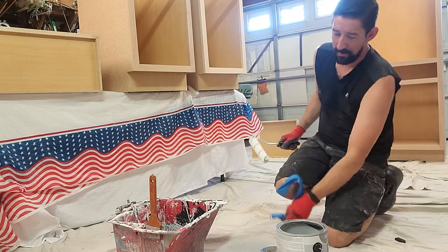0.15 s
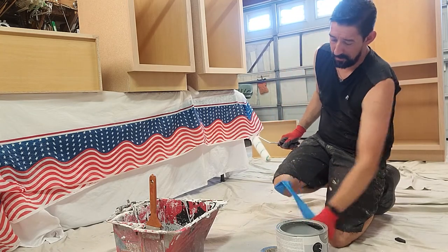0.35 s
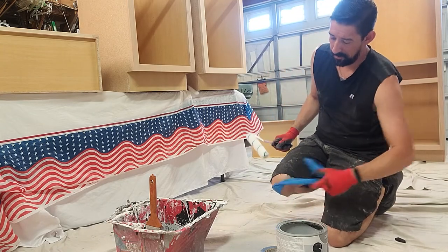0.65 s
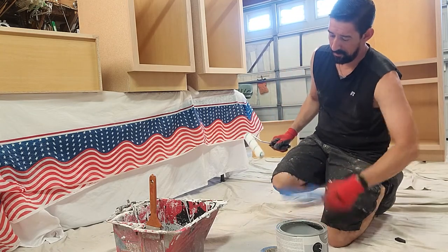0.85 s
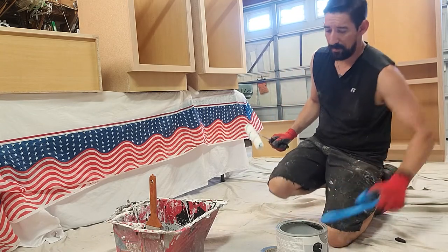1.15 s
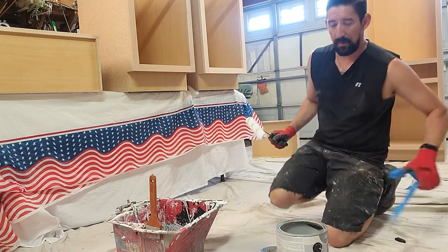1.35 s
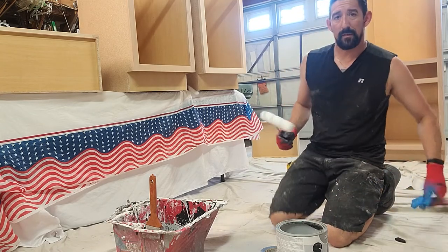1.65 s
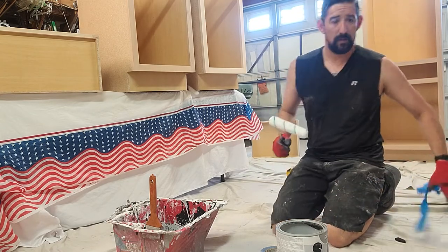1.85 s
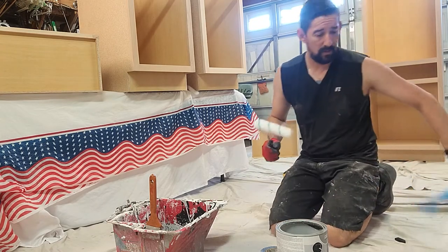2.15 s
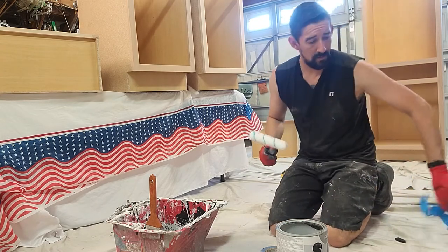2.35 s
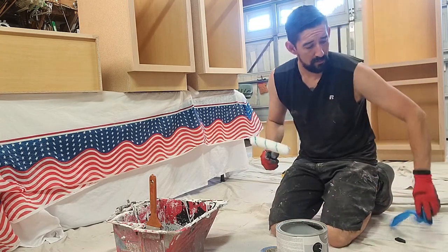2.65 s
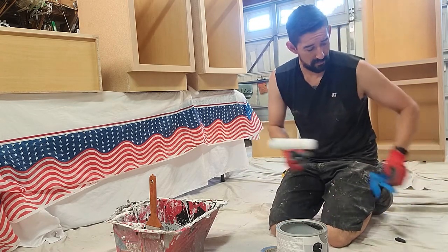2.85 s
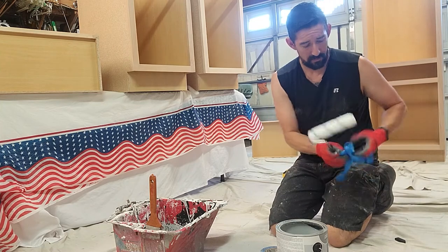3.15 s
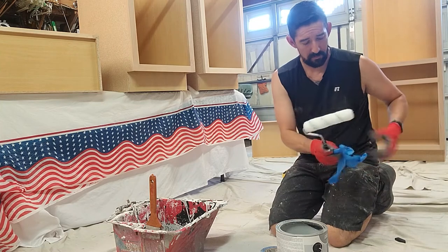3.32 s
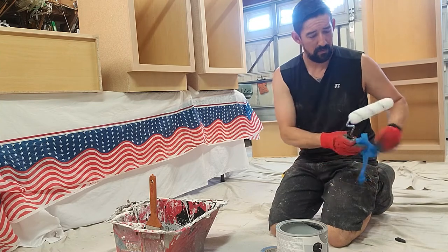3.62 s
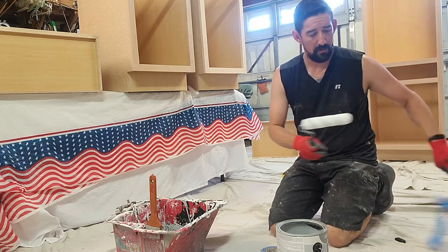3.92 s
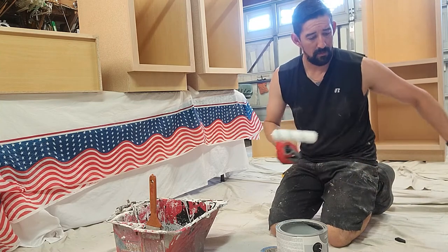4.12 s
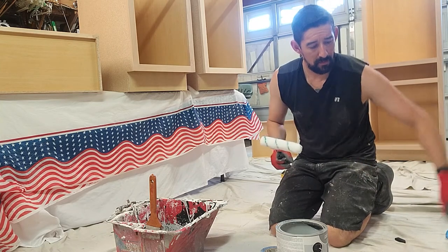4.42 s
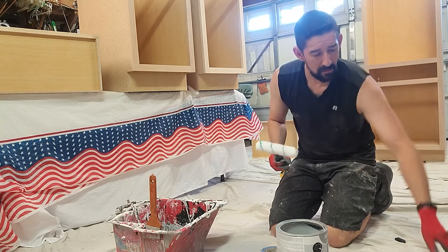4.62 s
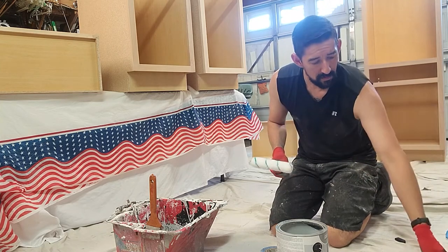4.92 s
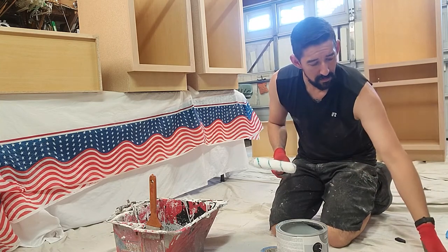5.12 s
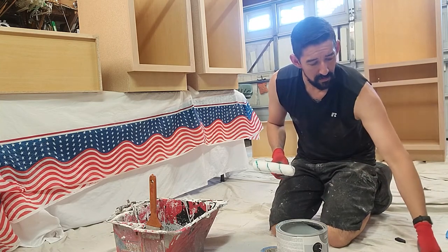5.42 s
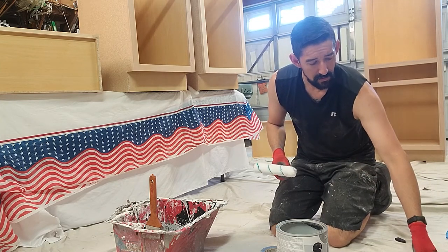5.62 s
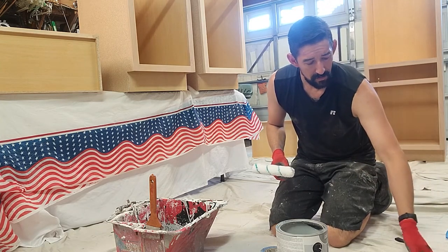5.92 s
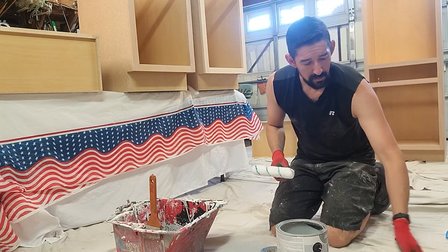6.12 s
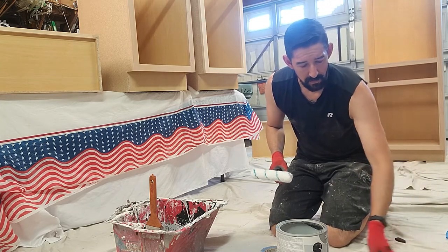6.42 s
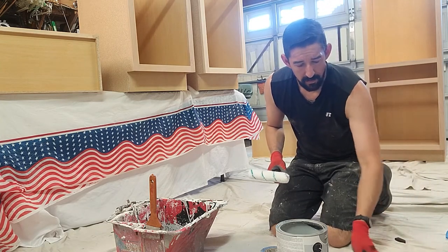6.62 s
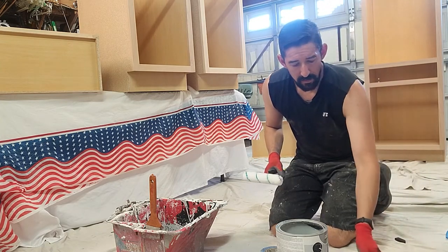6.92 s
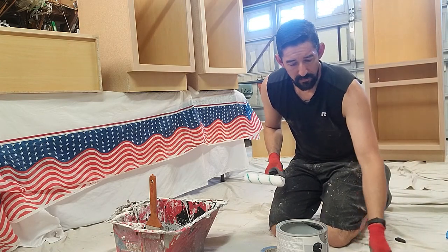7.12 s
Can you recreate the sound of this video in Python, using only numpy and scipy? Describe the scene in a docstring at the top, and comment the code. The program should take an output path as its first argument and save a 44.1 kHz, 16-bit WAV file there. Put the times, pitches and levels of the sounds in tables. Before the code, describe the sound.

Close, dry tape rips, papery pops and flutters, with one dull knee thud, then only a pulsing fan hum and faint cloth brushing.

```python
"""A fan runs throughout: motor and mains hums beat into a throb, under blade tones, rushing air and rumble.
From the start a painter pats masking tape onto a roller cover and rips it off to pull out loose fibres.
Each rip is a stream of tiny adhesive snaps; the strip also rasps, flutters and pops as it buckles.
Near 1.8 s a knee lands with a dull thud, among blunt knocks of roller, knee and hand.
After the last pull the strip is dropped at 4.3 s; a glove brushes the drop cloth, then a last soft knock."""
import sys
import numpy as np
from scipy import signal
from scipy.fft import rfft, irfft
from scipy.io import wavfile

SR = 44100
rng = np.random.default_rng(int(sys.argv[2]) if len(sys.argv) > 2 else 0)


def inscribe(sig):
    """Save sig as 16-bit PCM at rate SR to the path in sys.argv[1].

    A 1-D sig is mono; a 2-D sig holds one channel per row.
    Samples are clipped to [-1, 1] before scaling.
    """
    pcm = np.round(np.clip(np.atleast_2d(sig).T, -1, 1) * 32767)
    wavfile.write(sys.argv[1], SR, pcm.astype(np.int16))


N = 320166
T = np.arange(N) / SR

# Levels of tape and glove are those ahead of the garage's gain.
# tape pulled off the roller, light pats to full rips: (t/s, rise/s, hold/s, level/dB, body/dB near 1.4 kHz)
RIPS = [(.002, 0.003, 0.064, -38, 3), (0.072, 0.0099, 0.053, -36, -5.5), (0.719, 0.023, 0.0077, -35, -8.5),
        (0.8, 0.0027, 0.017, -37, -3), (0.941, 0.00092, 0.0087, -43.5, -26.5),
        (.987, 0.0026, 0.016, -32.5, -5.5), (1.484, 0.012, 0.055, -46, -4.5),
        (1.713, 0.023, 0.006, -43, -10.5), (1.822, 0.0022, 0.017, -46.5, -8.5),
        (2.214, 0.0026, 0.043, -37, -12), (2.626, .003, 0.069, -39, -11),
        (2.85, 0.018, 0.041, -45.5, -13.5), (3.186, 0.016, 0.043, -51, -0.5),
        (3.254, 0.025, 0.04, -37.5, -4), (3.612, 0.0057, 0.061, -46.5, -7.5),
        (3.72, 0.0063, 0.057, -41.5, -2.5), (3.786, 0.014, 0.024, -35.5, -3.5),
        (4.107, 0.017, 0.024, -67, 10)]
# the slack strip buckles by itself: (t/s, level/dB, ring f/Hz, crack lift/dB, chatter/s)
BUCKLES = [(0.2003, -31.5, 3150, -7, 0.021), (.4803, -31, 4030, -2, 0.041), (0.5517, -34, 2870, -32, 0.017),
           (.8091, -27, 4500, -18, 0.024), (1.1857, -31, 3240, -13.5, 0.009),
           (1.3563, -41.5, 3330, -17, 0.0017), (1.6347, -37.5, 3330, -34, 0.0066),
           (1.7828, -37, 2980, -24, 0.0071), (2.5015, -27.5, 2930, -18.5, 0.015),
           (2.597, -34, 2840, -20, .001), (2.6537, -28.5, 2920, -22, 0.056), (2.8638, -38, 2880, -5, 0.07),
           (3.058, -41.5, 3120, -21.5, 0.034), (3.9929, -35.5, 3150, -32, 0.0068),
           (4.132, -39, 2670, -25, 0.0066)]
# blunt knocks of roller, knee and hand: (t/s, level/dB, ring f/Hz, contact/s, t60/s)
KNOCKS = [(.013, -32, 1275, 0.0042, 0.091), (1.742, -50, 838, 0.0037, .12),
          (1.912, -30.5, 78.7, 0.014, 0.29), (2.228, -50.5, 580, 0.0047, 0.3),
          (6.585, -42, 297, 0.009, 0.12)]
# a glove brushes the drop cloth: (t/s, rise/s, hold/s, level/dB, rustle over hiss/dB)
BRUSHES = [(4.245, 0.044, 0.05, -86, 11), (4.844, 0.04, 0.032, -81.5, 13), (5.032, 0.1, 0.14, -86, -4),
           (6.09, 0.062, 0.276, -81.5, 7), (6.423, 0.052, 0.13, -66, -7)]
# spectrum of the paper tape: (f/Hz, relative density/dB)
TAPE_SPECTRUM = [(130, -34), (220, -4.5), (370, 6.5), (520, -1.5), (800, -0.5), (1100, -1), (1900, -2.5),
                 (3300, -4.5), (4600, -10.5), (5900, -10), (6900, -24.5), (8500, -17), (13000, -11),
                 (16000, -11.5)]
# spectrum of glove on cloth: (f/Hz, relative density/dB)
CLOTH_SPECTRUM = [(300, -10), (2000, -77), (5000, -4.5), (7000, -36), (9800, -18), (11200, 0.5),
                  (13000, -4), (16000, -8)]
# spectrum of the fan's rushing air: (f/Hz, relative density/dB)
AIR_SPECTRUM = [(94, -56.5), (160, -9), (218, -7.5), (254, -8), (280, -12), (381, 0.5), (582, -10.5),
                (628, -9.5), (666, -13.5), (1230, -14.5), (2380, -23), (4840, -30.5), (6850, -57.5),
                (10900, -45), (16000, -53)]
# spectrum of the low rumble: (f/Hz, relative density/dB)
RUMBLE_SPECTRUM = [(20, 10), (45, -22.5), (62, 18.5), (75, -28), (90, 17), (130, 17.5), (170, 0),
                   (260, -22), (1500, -98)]
# full tilt between the microphone ports: (f/Hz, left minus right/dB)
PORT_TILT = [(150, -2.5), (400, -1.5), (1300, 4.5), (2400, 2), (4400, 8), (8000, 13), (15000, 5.5)]
# fan overtones: (f/Hz, rms level/dB)
FAN_TONES = [(223.4, -63.5), (292.6, -64.5), (335, -79), (384, -71), (396, -85), (465, -70), (578, -71),
             (669.4, -68), (1233, -71.5), (1340, -86), (4334, -90), (4856, -81.5), (4940, -87)]
# resonances of the hollow roller core: (f/Hz, relative level/dB)
CORE_MODES = [(390, -16), (866, -16.5), (1120, -16), (1315, -0.5), (1650, 0.5), (2100, -12)]

# fan: the two hums crest together at THROB_S
MOTOR_HZ, MAINS_HZ, THROB_S = 111.64, 119.97, .135
MOTOR_DB, MAINS_DB, AIR_DB = -49, -52, -58.5  # rms
SLIP_WANDER_RAD, TONE_SWAY_DB = .16, 1.5
KNEE_S, KNEE_DB = 1.837, -44
TOP_HZ = 15900

# peel: all "per dB" settings count from a firm pull or from a body of 0 dB
FIRM_PULL_DB, CATCH_DB = -40, 3
RELEASE_S, RELEASE_PER_HOLD = 0.013, 0.042  # a longer pull takes longer to let go
# treble tilt, full from 8.5 kHz: more from a harder pull and a narrower strip
SIZZLE_DB, SIZZLE_PER_DB, SIZZLE_PER_BODY_DB = .5, 0.87, -0.12
# a fold pops as each pull comes taut; the gentler the start, the fainter the pop
POP_DB, POP_PER_DB, POP_EASE_DB_PER_S = -34.5, -0.06, 601
POP_HZ, POP_CRACK_DB = 3780, -4
# core level against the pull; a wide taut strip drives the core harder
CORE_DB, CORE_PER_BODY_DB, RASP_WIDTH = -8.5, 1.04, .16
# a buckled facet chatters around its ring, below its pop; a slow fold puts more into the chatter
CHATTER_DB, CHATTER_DB_PER_S, CHATTER_WIDTH = -20, 92, 0.4
# the strip rustles faintly in the hand until it is dropped
HELD_DB, DROP_S, DROP_FADE_S = -71.5, 4.32, 0.1
# it swings around each pull or buckle, gathering and settling
SWING_DB, SWING_PER_DB, BUCKLE_SWING_DB = -53.5, 1.2, -56
LEAD_S, SETTLE_S = 0.037, 0.04


def undb(db):
    """Decibels to gain."""
    return 10 ** (np.asarray(db) / 20)


def unit(x):
    """Scale to rms 1."""
    return x / np.sqrt(np.mean(x ** 2) + 1e-20)


def colour(x, points, size=2048):
    """Minimum-phase filter through (f/Hz, dB) points that keeps the power of white noise."""
    hz, db = np.transpose(points)
    bin_hz = np.arange(size + 1) * SR / size / 2
    log_gain = np.log(undb(np.interp(np.log(bin_hz + 1), np.log(hz), db)))
    # folding the cepstrum forward makes the filter causal
    cepstrum = irfft(log_gain)[:size]
    cepstrum[1:] *= 2
    response = irfft(np.exp(rfft(cepstrum, 2 * size)))[:size]
    return signal.fftconvolve(x, response / np.linalg.norm(response))[:len(x)]


def band(x, low_hz, high_hz):
    """Gentle band-pass."""
    edges = [low_hz, min(high_hz, SR / 2 - 100)]
    return signal.sosfilt(signal.butter(2, edges, "band", fs=SR, output="sos"), x)


def walk(rate):
    """Random drift through `rate` normal values a second, joined by straight lines."""
    knots = rng.standard_normal(1000)
    return np.interp(T * rate, np.arange(len(knots)), knots)


def add(track, s, sound):
    """Mix a sound into a track at a time."""
    i = max(int(s * SR), 0)
    track[i:i + len(sound)] += sound[:max(N - i, 0)]


def stroke(t, rise, hold, release):
    """A movement gathers force, holds and lets go."""
    gather = np.minimum(t / max(rise, 1 / SR), 1) ** 2
    return gather * np.exp(-np.maximum(t - rise - hold, 0) / release)


def threads(size, rate, scatter_db):
    """Lone clicks at random moments: many faint ones, a few strong."""
    strength = np.minimum(rng.exponential(size=size), 3)
    struck = rng.random(size) < rate / SR
    return struck * undb(scatter_db * strength) * rng.choice([-1, 1], size)


def lean(x, share):
    """Tilt the stereo image by a share of the port table: the left port hears more of the treble."""
    hz, db = np.transpose(PORT_TILT)
    bin_hz = np.arange(N // 2 + 1) * SR / N
    lean_db = share * np.interp(np.log(bin_hz + 1), np.log(hz), db)
    return irfft(rfft(x) * undb(np.array([lean_db, -lean_db]) / 2), N)


def fan(line_wander=0.34, rumble_db=-60, alike_hz=600):
    """An induction motor slips behind the mains, so their hums beat; blade tones and rushing air ride along."""
    turn = 2 * np.pi * (T - THROB_S)
    motor = undb(MOTOR_DB) * np.cos(MOTOR_HZ * turn + SLIP_WANDER_RAD * walk(0.22))
    mains = undb(MAINS_DB) * np.cos(MAINS_HZ * turn)
    tones = np.zeros((2, N))
    for hz, db in FAN_TONES:
        phase = hz * turn + line_wander * hz / 700 * walk(24)
        # higher tones reach the two ports more out of phase
        port_phase = rng.standard_normal((2, 1)) * min(hz / 800, 2)
        tones += undb(db + TONE_SWAY_DB * walk(3.8)) * np.cos(phase + port_phase)
    mid, side = (colour(band(rng.standard_normal(N), 136, 20000), AIR_SPECTRUM) for _ in range(2))
    # long waves reach both ports alike
    side = signal.sosfilt(signal.butter(1, alike_hz, "high", fs=SR, output="sos"), side) / np.std(mid)
    air = (unit(mid) + side * np.array([[1], [-1]])) * undb(AIR_DB + 1.6 * walk(1.6))
    rumble = undb(rumble_db) * unit(colour(rng.standard_normal(N), RUMBLE_SPECTRUM, size=8192))
    # root two turns rms levels into cosine peaks
    return np.sqrt(2) * (motor + mains + tones) + air + rumble


def echoes(early_db=3.0, early_s=0.021, tail_db=-2.0, t60_low=0.3, t60_mid=0.23, t60_high=0.082):
    """One path to a port: scatter from floor and cabinets, then the garage's ring, shortest in the treble."""
    t = T[:SR // 2]
    noise = rng.standard_normal((4, len(t)))
    early = noise[3] * (rng.random(len(t)) < .06) * (t > .0006) * np.exp(-t / early_s)
    bands = [(120, 2700, t60_low), (1990, 6000, t60_mid), (6000, 21950, t60_high)]
    tail = sum(band(n, low, high) * undb(-60 * t / t60) for n, (low, high, t60) in zip(noise, bands))
    tail *= np.minimum(t / 0.0069, 1)
    return undb(early_db) * early / np.linalg.norm(early) + undb(tail_db) * tail / np.linalg.norm(tail)


def garage(x, facing, gain_db=-4.5, facing_db=-1, lag_s=0.00021, change_s=.012, count=5):
    """The hands keep moving, so echo patterns fade from one to the next in a cycle; the left port hears first."""
    direct = x + undb(facing_db) * facing  # flat paper facets beam their pops straight ahead
    out = np.array([direct, np.interp(T - lag_s, T, direct, left=0)])
    for k in range(count):
        # distance in steps from this pattern's turn in the cycle
        apart = abs((T / change_s - k + count / 2) % count - count / 2)
        share = x * np.cos(np.pi / 2 * np.minimum(apart, 1))
        for port in out:
            port += signal.oaconvolve(share, echoes())[:N]
    return undb(gain_db) * out


def knee(rise=0.086, hold=0.028, release=0.072):
    """Body weight settles on the padded floor with a dull rumble."""
    rumble = unit(band(rng.standard_normal(N), 22, 113))
    return undb(KNEE_DB) * rumble * stroke(np.maximum(T - KNEE_S, 0), rise, hold, release)


def knocks():
    """Soft contacts each swell one damped mode."""
    out, t = np.zeros(N), T[:SR]
    for s, db, hz, contact, t60 in KNOCKS:
        mode = np.sin(2 * np.pi * hz * t)
        add(out, s, undb(db) * stroke(t, contact, 0, t60 / np.log(1000)) * mode)
    return out


def glove(release=0.012):
    """Fabric slides on canvas: a thin hiss and a mid-band rustle, both wavering in level."""
    out, t = np.zeros(N), T[:SR]
    for s, rise, hold, db, rustle_db in BRUSHES:
        hiss = colour(rng.standard_normal(len(t)), CLOTH_SPECTRUM)
        rustle = unit(band(rng.standard_normal(len(t)), 1400, 3100))
        add(out, s, undb(db) * (hiss + undb(rustle_db) * rustle) * stroke(t, rise, hold, release))
    return out * undb(6.3 * walk(40))


def swing(start, end):
    """The strip gathers motion ahead of a tug and settles after it."""
    return np.exp(-np.maximum(start - T, 0) / LEAD_S - np.maximum(T - end, 0) / SETTLE_S)


def flutter(rate=600, scatter_db=5.5, slide_db=-8, facet_db=-5, facet_rate=150,
            facet_low_hz=2600, facet_high_hz=4400):
    """Creases in the hanging strip tick and small facets ring while its faces slide over each other."""
    creases = unit(threads(N, rate, scatter_db)) + undb(slide_db) * rng.standard_normal(N)
    facets = undb(facet_db) * unit(band(threads(N, facet_rate, scatter_db), facet_low_hz, facet_high_hz))
    power = (undb(HELD_DB) * stroke(T, 0, DROP_S, DROP_FADE_S)) ** 2
    for s, rise, hold, db, _ in RIPS:
        swing_db = SWING_DB + SWING_PER_DB * (db - FIRM_PULL_DB)
        power += (undb(swing_db) * swing(s, s + rise + hold)) ** 2
    for s, *_, chatter_s in BUCKLES:
        power += (undb(BUCKLE_SWING_DB) * swing(s, s + chatter_s)) ** 2
    return (colour(creases, TAPE_SPECTRUM) + facets) * np.sqrt(power)


def rasp(attack=0.0015, release=0.0027):
    """Stick-slip drives the hollow roller core during a pull, and the stretched paper after a buckle."""
    out, t = np.zeros(N), T[:SR // 3]

    def ring(hz, width):
        """Stick-slip clicks heard through one resonance."""
        return unit(band(threads(len(t), 900, 1), hz / (1 + width), hz * (1 + width)))

    for s, rise, hold, db, body_db in RIPS:
        core = sum(undb(mode_db) * ring(hz, RASP_WIDTH) for hz, mode_db in CORE_MODES)
        core_db = db + CORE_DB + CORE_PER_BODY_DB * body_db
        add(out, s, undb(core_db) * core * stroke(t, rise, hold, release))
    for s, db, hz, _, chatter_s in BUCKLES:
        chatter_db = db + CHATTER_DB + CHATTER_DB_PER_S * chatter_s
        add(out, s, undb(chatter_db) * ring(hz, CHATTER_WIDTH) * stroke(t, attack, chatter_s, release))
    return out


def folds(spread=0.35):
    """List every popping fold (t/s, level/dB, f/Hz, crack lift/dB): the buckles, and one as each pull comes taut."""
    pops = [(s, db, hz, crack_db) for s, db, hz, crack_db, _ in BUCKLES]
    pitches = POP_HZ * np.exp(spread * (2 * rng.random(len(RIPS)) - 1))
    for (s, rise, _, db, _), hz in zip(RIPS, pitches):
        pop_db = POP_DB + POP_PER_DB * (db - FIRM_PULL_DB) - POP_EASE_DB_PER_S * rise
        pops.append((s + rise, pop_db, hz, POP_CRACK_DB))
    return pops


def crinkle(gain_db=-2, ring_s=0.00093, crack_s=0.0024, crack_db=7, width=0.14):
    """A fold pops through: a dry crack and a short ring of the paper facet."""
    out, t = np.zeros(N), T[:SR // 20]
    for s, db, hz, lift_db in folds():
        push, crack = rng.standard_normal((2, len(t)))
        ring = band(push * np.exp(-t / ring_s), hz / (1 + width), hz * (1 + width))
        crack = colour(band(crack * np.exp(-t / crack_s), 1170, 16200), TAPE_SPECTRUM)
        crack_share = undb(min(crack_db + lift_db, 3))
        pop = ring / abs(ring).max() + crack_share * crack / abs(crack).max()
        add(out, s, undb(db + gain_db) * pop)
    return out


def peel(rate=1500, scatter_db=5, catch_s=0.0023, fibre_db=-14, edge_db=3.0):
    """Adhesive threads snap one by one, in bunches as the peel line catches; fine fibres hiss between them."""
    out, t = np.zeros(N), T[:SR // 3]
    bin_hz = np.arange(len(t) // 2 + 1) * SR / len(t)
    for s, rise, hold, db, body_db in RIPS:
        fibres, catches = rng.standard_normal((2, len(t)))
        bunches = undb(CATCH_DB * np.interp(t / catch_s, np.arange(len(t)), catches))
        pull = stroke(t, rise, hold, RELEASE_S + RELEASE_PER_HOLD * hold)
        snaps = unit(threads(len(t), rate, scatter_db)) + undb(fibre_db) * fibres
        snaps *= bunches * pull
        # chance bunching leaves the energy of the pull unchanged
        snaps *= np.linalg.norm(pull) / np.linalg.norm(snaps)
        # a wide taut strip radiates more lows; a harder pull gives sharper snaps
        sizzle_db = SIZZLE_DB + SIZZLE_PER_DB * (db - FIRM_PULL_DB) + SIZZLE_PER_BODY_DB * body_db
        shelves = [(500, min(body_db, 0)), (1400, body_db), (2600, 0.0084),
                   (5800, edge_db + sizzle_db / 2), (8500, sizzle_db)]
        shelf_db = np.interp(bin_hz, *np.transpose(shelves))
        add(out, s, undb(db) * irfft(rfft(snaps) * undb(shelf_db), len(t)))
    return colour(out, TAPE_SPECTRUM)


def scene():
    """Tape work and small movements in front of the humming fan."""
    background = lean(fan(), 0.44)
    pops = crinkle()
    handling = glove() + flutter() + rasp() + pops + peel()
    return background + knee() + knocks() + lean(garage(handling, pops), 0.77)


def record(dry):
    """The phone cuts the top with a steep low-pass."""
    return signal.sosfilt(signal.ellip(10, .2, 80, TOP_HZ, fs=SR, output="sos"), dry)


dry = scene()
out = record(dry)
inscribe(out)
```